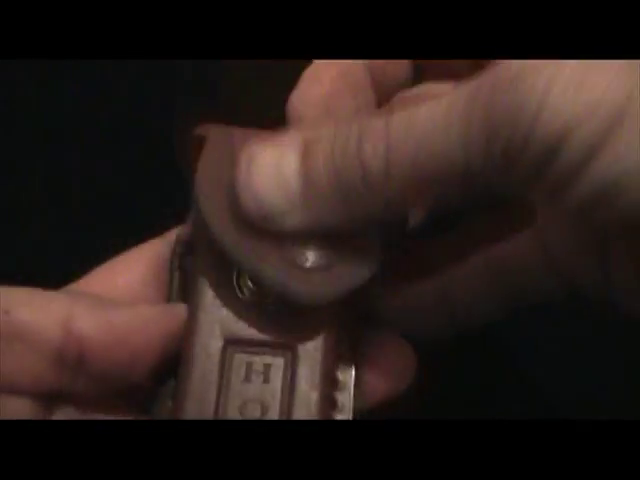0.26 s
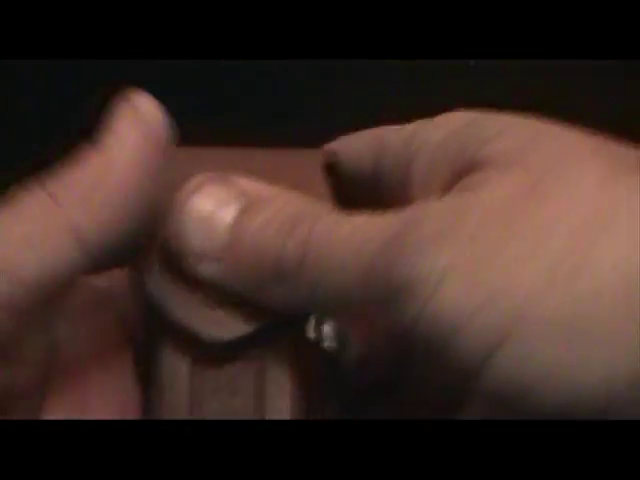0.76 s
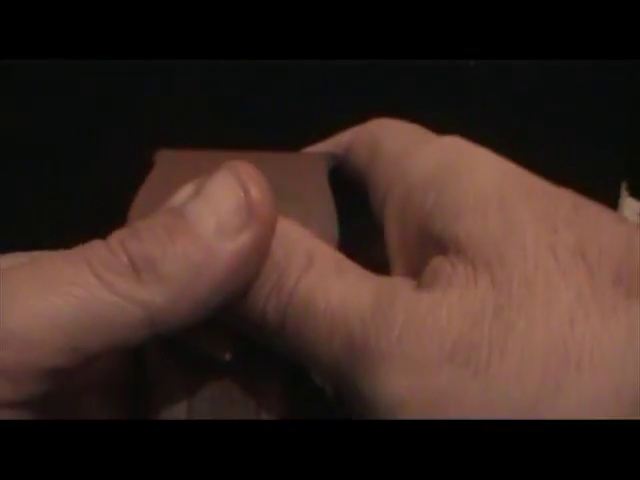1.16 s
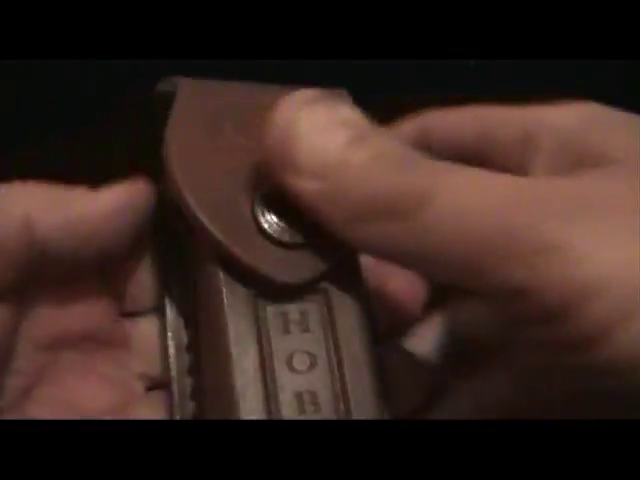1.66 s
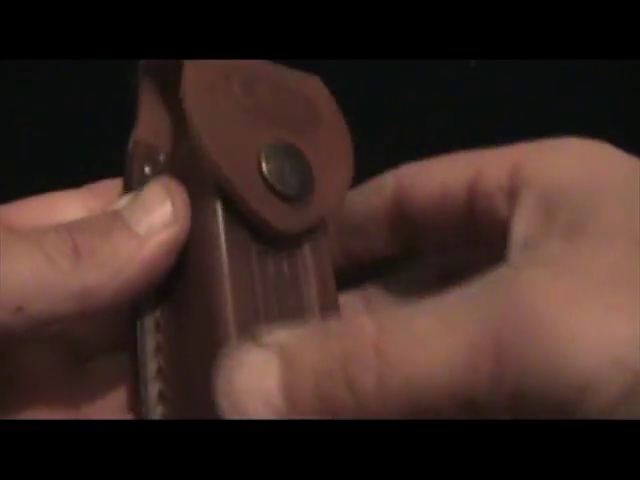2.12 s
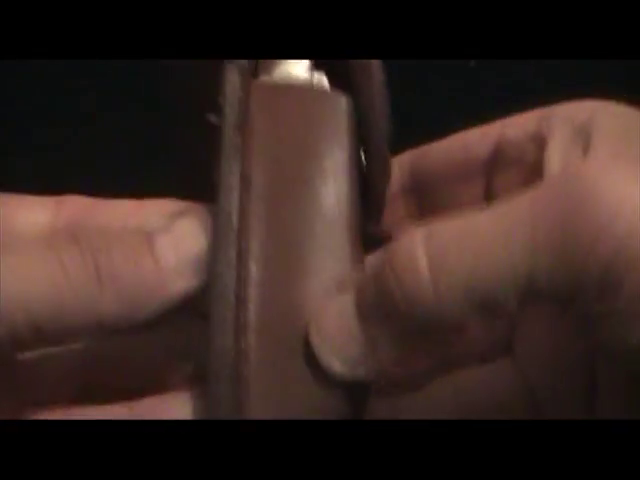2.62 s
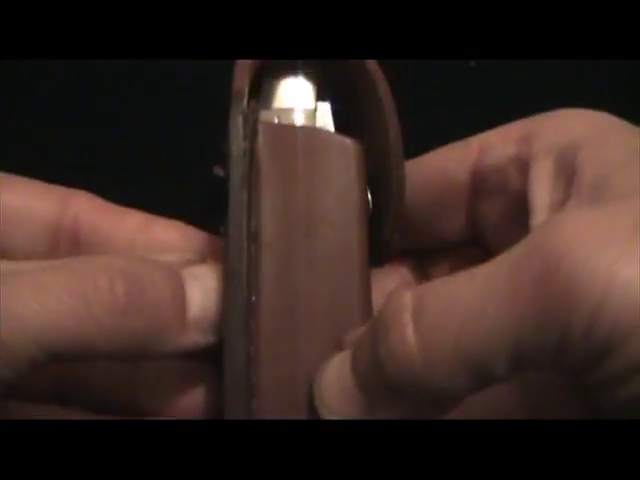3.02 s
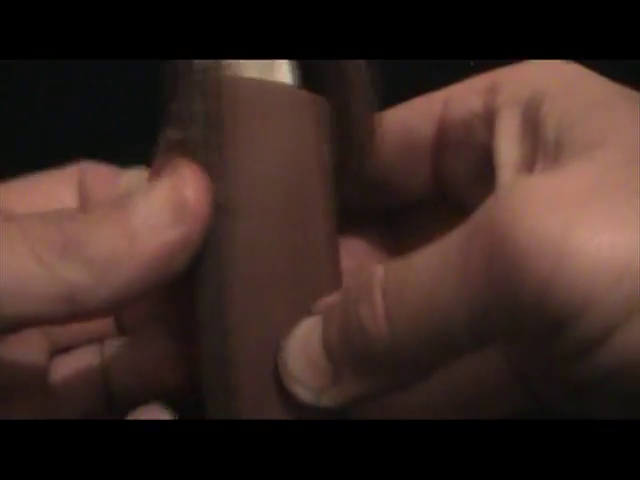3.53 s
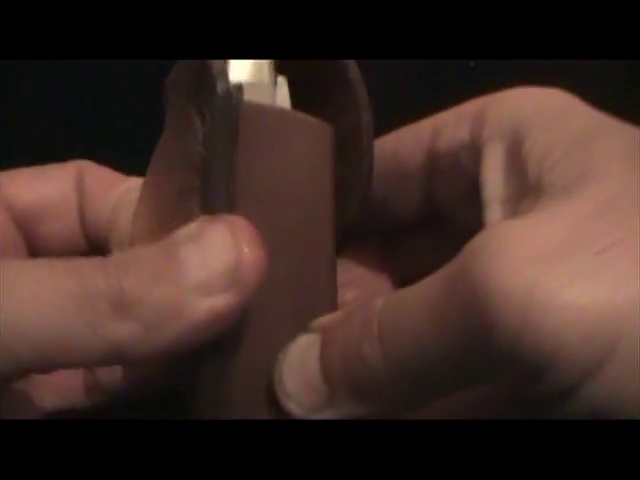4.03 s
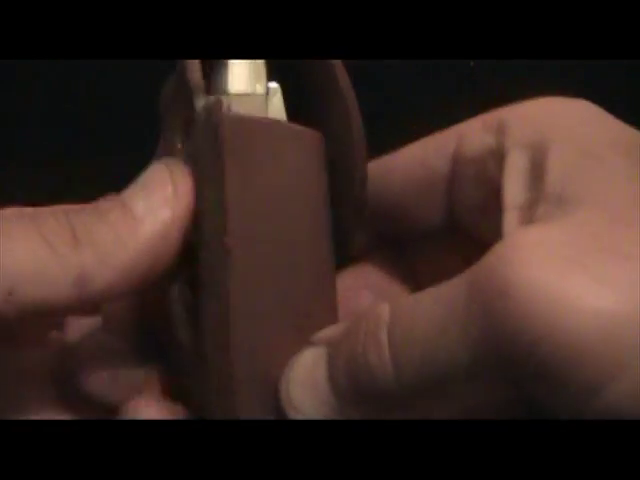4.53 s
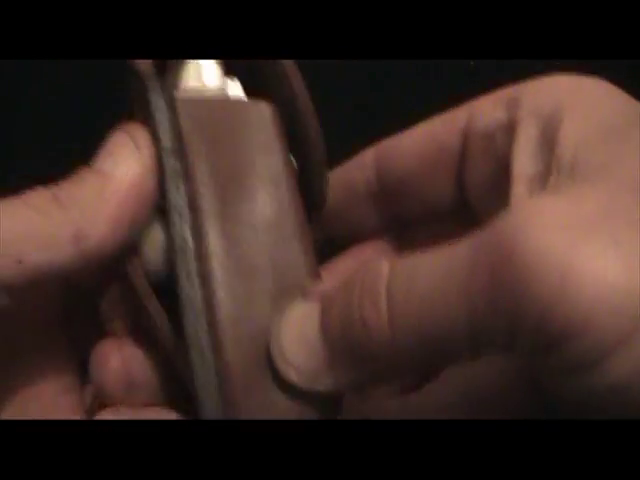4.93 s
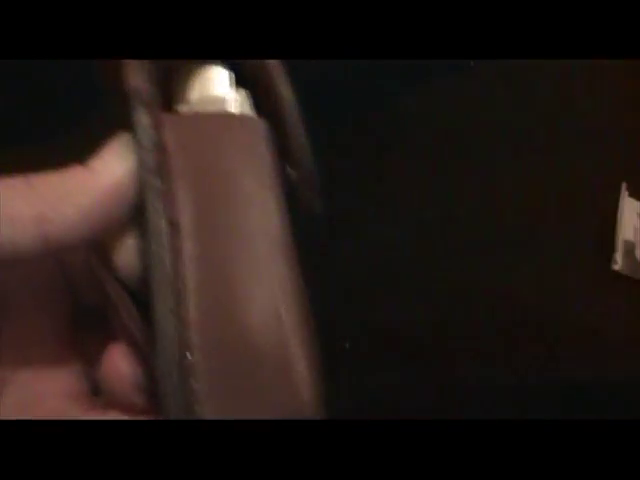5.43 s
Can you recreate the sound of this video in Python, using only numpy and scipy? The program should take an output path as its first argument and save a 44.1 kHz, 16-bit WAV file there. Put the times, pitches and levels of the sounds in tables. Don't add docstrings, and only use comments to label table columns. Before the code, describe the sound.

Near, dry leather sounds over low microphone hiss: fingers stroke and squeeze a flap, a metal stud bangs shut with a bright crack and faint room tail, the hollow sheath is turned and tapped, and its belt loop is pried with dense creaking and woody pops. The last second is nearly still, with light rubbing.

```python
import sys
import numpy as np
from scipy import signal
from scipy.fft import rfft, irfft
from scipy.io import wavfile
from scipy.ndimage import uniform_filter1d

SR = 44100
rng = np.random.default_rng(int(sys.argv[2]) if len(sys.argv) > 2 else 0)


def boost(x):
    u = np.asarray(x, float) / 20
    return 10 ** u


def dump_mix(stems):
    frames = np.atleast_2d(stems).T
    limited = np.clip(frames, -1, 1)
    pcm = np.round(limited * 32767).astype(np.int16)
    wavfile.write(sys.argv[1], SR, pcm)


N = 249951
TIME = np.arange(N) / SR
SNAP_S = 1.226
STROKE_FADE_DB, STROKE_ROUNDNESS = 17, 1.8


def unit(x):
    return x / np.sqrt(np.mean(x ** 2))


def colour(x, points):
    hz, db = np.transpose(points)
    bins = np.maximum(np.fft.rfftfreq(x.shape[-1], 1 / SR), 1)
    gain = boost(np.interp(np.log(bins), np.log(hz), db))
    return irfft(rfft(x) * gain, x.shape[-1])


def band(x, hz, width):
    return signal.lfilter(*signal.iirpeak(hz, hz / width, fs=SR), x)


def resonate(x, peaks):
    return unit(sum(boost(db) * band(band(x, hz, width), hz, width) for hz, width, db in peaks))


def butter(x, order, hz, kind="lowpass"):
    return signal.sosfilt(signal.butter(order, hz, kind, fs=SR, output="sos"), x)


def ring(hz, t60, size):
    t = TIME[:size]
    return np.sin(2 * np.pi * hz * t) * np.exp(-np.log(1000) * t / t60)


def add(out, s, sound):
    i = int(s * SR)
    out[i:i + len(sound)] += sound[:N - i]


def walk(rate):
    k = int(SR / rate)
    return uniform_filter1d(np.repeat(rng.standard_normal(N // k + 1), k), k)[:N]


def hush():
    # (frequency [Hz], level per Hz [dB])
    hush_colour = [(15, -65), (25, -21), (130, -6.5), (330, -10), (1250, -16), (4400, -26.5), (7650, -34.5),
                   (14500, -38)]
    # (frequency [Hz], side minus mid [dB])
    hush_side = [(60, 6), (150, -2.5), (400, 3), (15000, 4.5)]
    # (frequency [Hz], level [dB], phase [rad])
    whine_ports = [(15735, -65, 0), (15735, -67.5, -2.2)]
    # (frequency [Hz], width [Hz], level [dB])
    hum_bands = [(219, 45, -62.5), (513, 40, -76.5)]
    mid, side = colour(rng.standard_normal((2, N)), hush_colour)
    mid, side = butter([mid, colour(side, hush_side)], 8, 14300.)
    gain = boost(-59.5 + 0.56 * walk(2.7)) / np.std(mid)
    whine = []
    for hz, db, lag in whine_ports:
        strength = np.sqrt(2) * boost(db + 2.2 * walk(14.))
        whine.append(strength * np.sin(2 * np.pi * hz * TIME + lag + .2 * walk(8.)))
    hum = 0
    for hz, width, db in hum_bands:
        drone = band(band(rng.standard_normal((2, N)), hz, width), hz, width)
        hum = hum + boost(db) * unit(drone)
    return gain * np.array([mid + side, mid - side]) + whine + hum


def slips(per_s, spread_db):
    when = rng.random(N) < per_s / SR
    size = np.minimum(rng.exponential(size=N), 3)
    return when * boost(spread_db * size) * np.sign(rng.standard_normal(N))


def strokes():
    # (loudest at [s],
    # reach [s], body [dB], rasp re body [dB], dry hiss re body [dB])
    skin_strokes = [(.03, 0.29, -60, -2, -5.5), (0.217, 0.052, -51, -8, -16), (0.316, 0.036, -47.5, -3, -6),
                    (.375, 0.054, -49, -12, -14), (0.4125, 0.0032, -49.5, -1, 9.5),
                    (.53, 0.16, -55.5, -7.5, -11), (.63, 0.1, -58, -1.5, -0.5),
                    (.688, 0.06, -45.5, -14, -18.5), (0.789, 0.025, -48.5, -26, -13),
                    (.905, 0.057, -53, -11, -12.5), (1.0, 0.125, -59, -10.5, -14),
                    (1.15, 0.16, -55, -14.5, -16), (1.265, 0.063, -38, -10.5, -23),
                    (1.33, 0.053, -50, -15, -15.5), (1.47, 0.02, -52, -5.5, -15),
                    (1.495, 0.0296, -51, -5, 3.5), (1.575, 0.061, -53, -2, -6),
                    (1.722, 0.049, -49.5, -10, -5), (1.906, 0.058, -47, -7.5, -4),
                    (2.04, 0.054, -48.5, -6, -11.5), (2.14, 0.066, -52, -8, -10.5),
                    (2.22, 0.11, -61.5, -3, -8), (2.391, 0.043, -56, -3, -2),
                    (2.449, 0.034, -45.5, -10.5, -8.5), (2.56, 0.099, -48.5, -4.5, -15),
                    (2.66, 0.052, -54.5, -6, -11), (2.83, 0.044, -59.5, 3, -13),
                    (2.918, 0.019, -47.5, -5, -12), (3.023, 0.005, -53, 8, 1),
                    (3.045, 0.00925, -54, -4.5, -15.5), (3.08, .15, -71.5, -5, -19),
                    (3.2, 0.069, -57, -16, -28.5),
                    (3.291, 0.091, -51, -2, -10.5), (3.38, 0.1, -56.5, -15.5, -36.5),
                    (3.47, 0.068, -57.5, -6.5, -23.5), (3.522, 0.02, -44.5, 0, -4.5),
                    (3.552, 0.027, -38.5, 0.5, -6.5), (3.666, 0.05, -51, -3, -8),
                    (3.72, 0.033, -52.5, -1.5, -15.5), (3.775, 0.03, -50.5, -1, -5),
                    (3.9, 0.067, -53.5, -7, -17), (3.98, 0.12, -56, -7, -20),
                    (4.093, 0.044, -47.5, -3, -12), (4.263, 0.0334, -46.5, -6.5, -9),
                    (4.428, 0.0343, -38, -11, -11.5), (4.472, 0.017, -39, -7.5, -3),
                    (4.351, 0.054, -51.5, -6, -8), (4.572, 0.074, -52.5, -1.5, -8.5),
                    (4.68, 0.068, -54.5, -16, -15), (4.76, 0.094, -57, -7, -16),
                    (4.856, 0.037, -50, -8.5, -21), (4.885, 0.0099, -32, -5, -7.5),
                    (4.96, 0.053, -65, -17, -19.5), (5.07, 0.22, -62, -7, -11),
                    (5.212, 0.0278, -50.5, -1, -9.5), (5.66, 0.099, -59.5, 2, -5.5)]
    hold_db = -70.5 + np.array([[0], [-6.5], [-5]])
    power = boost(hold_db) ** 2 * np.ones(N)
    for s, reach, db, rasp_db, hiss_db in skin_strokes:
        near = slice(max(int((s - 3 * reach) * SR), 0), int((s + 3 * reach) * SR))
        swell_db = db - STROKE_FADE_DB * np.abs((TIME[near] - s) / reach) ** STROKE_ROUNDNESS
        power[:, near] += boost(swell_db + np.array([[0], [rasp_db], [hiss_db]])) ** 2
    return np.sqrt(power)


def rub():
    # (frequency [Hz], width [Hz], level [dB])
    hollow = [(814.3, 700, 2.5), (1250, 930, 9), (1860, 1200, 6), (2293, 1300, -8.5)]
    # (frequency [Hz], width [Hz], level [dB])
    loop_ring = [(1370, 1136, 0)]
    # (frequency [Hz], width [Hz], level [dB])
    grain = [(3140, 1600, 17), (4145, 2300, 9)]
    # (frequency [Hz], width [Hz], level [dB])
    dry_skin = [(7670, 4200, 0), (12800, 18000, -6.5)]
    turned_s, turned_share = 1.62, .35
    pried_s, pried_share = 3.25, 0.6
    body_gain, rasp_gain, hiss_gain = strokes()
    coarse, fine = unit(slips(3000., 3.)), unit(slips(12000., 0.83))
    flutter = boost(1.8 * walk(90.))
    body = resonate(coarse + 0.32 * fine, hollow) * body_gain * boost(1.5 * walk(140.))
    loop = resonate(coarse, loop_ring) * body_gain
    pried = np.where(TIME > pried_s, pried_share, turned_share * (TIME > turned_s))
    body = np.sqrt(1 - pried) * body + np.sqrt(pried) * loop
    rasp = resonate(1.6 * coarse + fine, grain) * rasp_gain * boost(1.1 * walk(30.))
    hiss = resonate(0.047 * coarse + fine, dry_skin) * hiss_gain * boost(2.4 * walk(30.))
    return boost(-2.0) * flutter * (body + rasp + hiss)


def releases():
    # (time [s], peak [dB])
    nail_ticks = [(.0715, -59), (.3155, -36), (.4038, -44), (.6613, -43.5), (1.69, -50.5), (1.884, -46),
                  (2.6694, -49), (2.6898, -46.5), (3.2561, -52), (3.449, -38), (3.4695, -51.5),
                  (3.9146, -47.5), (4.6497, -45), (2.699, -55), (4.5688, -46)]
    # (time [s], peak [dB], ring [Hz])
    crisp_creaks = [(.3831, -42, 860), (.413, -40, 1600), (2.896, -48, 1682), (2.899, -51, 1600),
                    (4.4175, -35, 1730), (4.4645, -35, 1554), (.9478, -37.5, 1210), (1.8432, -45.5, 2455),
                    (2.405, -42, 1627), (2.4608, -32, 1860), (2.6508, -45, 1208), (3.2846, -46, 1274),
                    (3.3185, -44, 2370), (3.3714, -34, 1250), (3.3798, -34, 1210), (3.5123, -34, 1090),
                    (3.7012, -36, 1560), (3.9197, -40.5, 1117), (3.946, -34, 1250), (3.9651, -34.5, 1250),
                    (4.1557, -45.5, 1020), (4.248, -31.5, 1220), (4.274, -25.5, 1350), (4.3937, -35, 1300),
                    (4.4065, -39, 1346), (4.4851, -28, 1290), (4.5159, -33.5, 1430), (4.55, -35, 1410),
                    (4.698, -34, 1250), (4.8783, -40.5, 1156)]
    # (time [s], peak [dB], ring [Hz], crack re peak [dB], thump re peak [dB])
    pops = [(.4195, -27, 1260, -15, -20.5), (2.9052, -28, 1340, -23.5, -8.5),
            (2.9083, -33, 1150, -5, -13.5), (3.5529, -31.5, 1600, 3.5, -10), (4.3603, -15, 1370, -14, -35),
            (4.4375, -28, 1410, -11, -31.5), (4.4401, -24, 1250, -11, -28),
            (4.4423, -13.5, 1064, -13.5, -6.5), (4.4715, -24.5, 1350, -21.5, -34.5),
            (4.474, -32.5, 1100, -16, -34), (4.8838, -26, 1650, -4.5, -11.5), (4.8872, -21, 1374, -5.5, -5),
            (4.8903, -29, 1377, -20, -15), (.4222, -33.5, 1200, -31, -20.5)]
    # (time [s], peak [dB], ring [Hz])
    dull_creaks = [(.462, -41, 1180), (.6859, -38.5, 1240), (.8, -40, 2370), (.8308, -35.5, 2284),
                   (2.142, -44.5, 2360), (2.4478, -36, 1194), (2.4537, -35, 1045), (3.1549, -40, 2370),
                   (3.334, -32.5, 1450), (3.3428, -41.5, 1155), (3.495, -44, 1750), (3.6135, -43, 1490),
                   (3.624, -28.5, 1348), (4.4545, -32, 903), (4.4785, -35, 1300), (3.786, -41.5, 1415),
                   (3.8683, -44.5, 1105), (4.0, -41, 1033), (4.0887, -42, 1002), (4.5647, -29, 1548),
                   (4.6027, -31, 1530), (4.6107, -44, 1220), (4.6223, -31.5, 1330), (4.656, -31, 1470),
                   (4.7545, -45.5, 1300), (4.9178, -40, 1340), (4.8985, -38, 1390), (4.671, -38, 1280),
                   (4.6755, -46.5, 1405), (4.6805, -45.5, 1250), (4.7165, -38, 1350), (4.725, -46, 1413),
                   (4.7455, -43.5, 1500), (4.789, -48, 1300), (4.595, -38, 1307), (5.2206, -51.5, 1308),
                   (5.4258, -44.5, 1977)]
    # (time [s], peak [dB], ring [Hz], crack re peak [dB])
    taps = [(.7868, -45.5, 1263, -19.5), (1.4704, -39, 1093, -2.5), (2.25, -46, 1520, -21),
            (2.9473, -40, 1790, -1), (2.9715, -46.5, 1900, -0.5), (2.9965, -43, 1637, 3),
            (3.0055, -50, 1200, -11), (3.028, -44, 745, 1), (3.0806, -39.5, 881.7, 0.5),
            (3.1094, -38, 944, -2.5), (3.1269, -40, 1250, 2), (3.1472, -32.5, 1610, 0.5),
            (4.063, -37.5, 1067, -22), (4.2812, -39, 1440, -21), (4.3272, -42, 1480, -12.5),
            (4.3495, -46, 1370, -17), (4.4141, -36, 2140, -9)]
    # (time [s], peak [dB], ring [Hz])
    fibres = [(.8947, -41, 2304), (1.1215, -55, 2300), (1.1348, -44, 1908), (3.3305, -39, 1497),
              (3.3375, -34, 1350), (3.3575, -45, 1300), (3.3845, -42, 1250), (3.9262, -47, 2300),
              (4.055, -47, 1900), (4.0835, -43, 1300), (4.2515, -38, 2200), (4.2695, -39, 2000),
              (4.7375, -46, 1600), (5.0655, -45, 1400), (5.0745, -45, 1500)]
    # (time [s], peak [dB], ring [Hz])
    squeeze = [
        (1.0945, -35, 1840),
        (1.1015, -35, 1100),
        (1.1048, -28.5, 1535),
        (1.1163, -32.5, 1900),
        (1.1303, -33, 2379),
        (1.1455, -32.5, 1340),
        (1.168, -30, 1700),
        (1.1829, -29.5, 2230),
        (1.195, -31, 1004),
        (1.2092, -34.5, 980),
    ]
    # (time [s], peak [dB], ring [Hz])
    settling = [(1.2385, -34.5, 952), (1.2475, -30, 1250), (1.258, -34, 993), (1.2622, -32.5, 1300),
                (1.2665, -30, 1150), (1.2757, -29, 1250), (1.2865, -32, 1050), (1.2965, -33, 1011),
                (1.3035, -34.5, 1100), (1.311, -34.5, 1052), (1.318, -31, 1050), (1.3252, -30.5, 1156),
                (1.3332, -31, 1064), (1.344, -31, 1046)]
    # (time [s], peak [dB])
    creep = [(4.9262, -40.5), (4.9518, -35), (4.9775, -36.5), (4.9903, -38), (5.0037, -37.5), (5.0569, -44),
             (5.0781, -38.5), (5.0869, -33.5), (5.117, -43.5), (5.1455, -45), (5.212, -41.5)]
    # (ring [Hz] if common, crack re peak [dB], thump re peak [dB])
    kinds = [(nail_ticks, (1600., 5.5, -45)), (crisp_creaks, (-4.5, -21)), (pops, ()),
             (dull_creaks, (-19.5, -23.5)), (taps, (-0.5,)), (fibres, (-7, -29)),
             (squeeze, (-16.5, -29.5)), (settling, (-6.5, -34.5)), (creep, (1350., -8.5, -26))]
    return [(*row, *shared) for rows, shared in kinds for row in rows]


def creaks():
    # (frequency [Hz], level [dB], t60 [s])
    edge_modes = [(3300, 0, .006), (5100, -3, .005), (7500, -11, .003)]
    rows = releases()
    size = 1200
    out, grit, t = np.zeros(N), rng.standard_normal((len(rows), size)), TIME[:size]
    for (s, db, hz, crack_db, thump_db), noise in zip(rows, grit):
        spread = 1 + .05 * noise[:4]
        big = db > -24.5
        loop = s > 4.5
        tap = 2.94 < s < 3.15
        squeezed = .75 < s < 1.22
        settles = SNAP_S < s < 1.35

        swell_s = .0008 if big else .0011 if loop else .0005
        grip_s = 0.00361 if big else .0014 if settles else 0.0023
        onset = 1 - np.exp(-t / swell_s)
        grip = np.exp(-(t / grip_s) ** 2)
        wall_modes = zip((850., 1700., 2350.), (.45, .5, .5), spread)
        walls = sum(g * ring(f * k, 0.055, size) for f, g, k in wall_modes)
        if squeezed:
            body = ring(hz * spread[3], 0.024, size) + 1.3 * walls + 1.2 * band(noise, 1600., 1700.0)
        else:
            wall_share = .12 if big else 0.45 if settles else 0.34
            body = ring(hz * spread[3] ** 1.2, 0.015, size) + wall_share * walls
        body = onset * grip * body

        top_hz = 6800. * 2 ** (crack_db / 18.) * (3 if loop else 1)
        top_hz = 7000. if tap else np.clip(top_hz, 3500, 14000)
        edge = sum(boost(g) * ring(f * k, t60, size) for (f, g, t60), k in zip(edge_modes, spread[1:]))
        tearing = band(band(band(noise, 2900.0, 5500.), 3200.0, 7000.), 4200., 8000.)
        tearing_gain = 0.88 if tap else 2.8
        crack = butter(edge + tearing_gain * tearing * np.exp(-t / 0.0012), 3, top_hz)

        thump = band(ring(540.0 * spread[2], 0.0087, size), 350.0, 600.) + 0.1 * ring(330.0, 0.0073, size)
        boom = .8 if tap else 0.47 * big
        thump = thump + boom * np.abs(thump).max() * ring(340.0, 0.018, size)

        body, crack, thump = (v / np.abs(v).max() for v in (body, crack, thump))
        release = 1.135 * body + boost(crack_db + 3.5) * crack + boost(thump_db + 0.86) * thump
        add(out, s - .0003, -boost(db) * release)
    return butter(out, 2, 110., "highpass")


def room(x):
    # (frequency [Hz], t60 [s], level [dB])
    room_octaves = [(595.6, 0.36, -43), (1200, 0.7, -36.5), (2470, 0.32, -35.5), (4852, .3, -31),
                    (8000, .21, -30.5), (11140, 0.11, -35.5), (14500, .055, -45.5)]
    gap_s = 0.0081
    t = TIME[:22050]
    start = np.clip((t - gap_s) / .008, .22, 1)
    noise = rng.standard_normal((2, len(t)))
    tail = 0
    for hz, t60, db in room_octaves:
        octave = butter(noise, 3, [hz / 1.45, min(hz * 1.3, 17000)], "bandpass")
        tail = tail + boost(db - 13.0) * octave * np.exp(-np.log(1000) * t / t60)
    return signal.fftconvolve(x[None], start * tail, axes=1)[:, :N]


def motor():
    out = np.zeros(N)
    field_s = 1 / 59.94
    cycles = np.arange(.1218, N / SR, 9 * field_s)
    steps = (cycles[:, None] + np.array((0, 2, 4, 6)) * field_s).ravel()
    for s, chance in zip(steps[steps < N / SR], rng.standard_normal(len(steps))):
        add(out, s - .002, boost(-56 + 1.5 * chance) * ring(3950., .012, size=900))
    return out


def whistles():
    # (loudest at [s], reach [s], frequency [Hz], level [dB])
    ridge_drags = [(.218, 0.034, 4500, -51), (.222, .04, 8800, -69), (0.296, 0.019, 4600, -56.5),
                   (.35, .06, 8000, -66), (.89, .025, 8500, -63), (.92, .03, 13500, -62.5),
                   (1.265, 0.042, 3700, -46), (1.27, .04, 2400, -44), (2.92, 0.018, 3500, -55),
                   (4.468, 0.011, 3300, -50), (1.27, .06, 5800, -50), (1.28, .06, 8200, -56),
                   (.305, 0.017, 8500, -55.5), (2.38, .03, 3290, -64), (2.56, .09, 6000, -66.5),
                   (2.63, .05, 3180, -64), (3.29, 0.053, 5300, -62), (3.54, 0.05, 3150, -51.5),
                   (4.272, .009, 3970, -46), (4.782, .014, 3600, -61), (5.213, 0.021, 4600, -60)]
    out = np.zeros(N)
    t = TIME[:13000] - TIME[6500]
    for (s, reach, hz, db), noise in zip(ridge_drags, rng.standard_normal((len(ridge_drags), 13000))):
        width = hz / 3.5
        tuned = unit(band(band(noise, hz, width), hz, width))
        swell_db = db - STROKE_FADE_DB * np.abs(t / reach) ** STROKE_ROUNDNESS
        add(out, s - TIME[6500], tuned * boost(swell_db))
    return out


def stud():
    # (time [s], level [dB], push [ms])
    cap_taps = [
        (.402, -33, .03),
        (.4158, -34, .03),
        (.4195, -29, .05),
    ]
    # (time [s], level [dB], push [ms])
    snap_blows = [
        (1.2213, -7.5, 0.074),
        (1.2221, -11.5, 0.24),
        (1.224, -9.5, 0.26),
        (1.2257, -0.5, .03),
        (1.22604, -0.5, 0.046),
        (1.22638, 3, 0.093),
        (1.22683, 3, .14),
        (1.2273, 4, .18),
        (1.2279, 2.5, 0.17),
        (1.2287, -3.5, .2),
    ]
    # (frequency [Hz], level [dB], t60 [s])
    stud_modes = [(616.7, -30.5, 0.005), (1100, -11.5, 0.019), (1350, -8.5, 0.0081), (1700, -7.5, 0.009),
                  (2400, 1, 0.0074), (3600, 2, 0.0026), (4400, 3.5, 0.0033), (5605, -3, 0.004),
                  (6600, 1.5, .003), (8030, 10.5, 0.003), (8940, 8, 0.0024), (10900, 5.5, .0025),
                  (12787, 1, 0.0018)]
    # (time [s], frequency [Hz], level [dB], t60 [s])
    metal_rings = [(.4022, 9000, -33, .006), (.4158, 5700, -33, .008), (.6608, 6000, -38, .012),
                   (.6608, 9000, -43, .008), (1.228, 2140, -50, .8), (1.238, 5550, -29, .018),
                   (1.239, 3650, -28, .02), (2.905, 3500, -40, .03), (3.0806, 5200, -46, .012),
                   (3.1472, 5100, -39, .012), (3.9651, 5000, -41, .012), (4.8835, 4550, -32, .03),
                   (5.29, 7880, -73, 1.2)]
    out = np.zeros(N)
    thumb = np.exp(-(TIME[:900] / 0.0037) ** 2)
    for s, db, push_ms in cap_taps + snap_blows:
        blow = 0
        for hz, mode_db, t60 in stud_modes:
            softness = 1 / (1 + (hz * push_ms / 500) ** 2)
            blow = blow + boost(mode_db) * softness * ring(hz, t60, size=900)
        add(out, s, -boost(db - 1.0) * thumb * blow)
    metal_onset = np.minimum(TIME[:13000] / 0.0011, 1)
    for s, hz, db, t60 in metal_rings:
        add(out, s, boost(db) * ring(hz, t60, size=13000) * metal_onset)
    out = butter(out, 2, 13000.)
    return butter(out, 4, 550., "highpass")


def jolts():
    # (time [s], level [dB])
    shakes = [
        (1.225, -19),
        (1.47, -41),
        (2.929, -41),
        (3.553, -35),
        (3.885, -46),
        (4.272, -47),
        (4.48, -28),
        (4.64, -50.5),
        (4.887, -36),
    ]
    out = np.zeros(N)
    for s, db in shakes:
        add(out, s, boost(db) * ring(48.29, 0.013, size=6000))
    pan_db = 12
    return out * boost(np.array([[pan_db], [-pan_db]]) / 2)


def scene():
    # (frequency [Hz], side minus mid [dB])
    side_colour = [(60, -6.5), (250, -12.5), (700, -19), (2500, -14.5), (5000, -12), (12000, -9)]
    leather = butter(rub() + creaks(), 8, 14600.)
    near = leather + stud()
    side = signal.hilbert(colour(near, side_colour)).imag
    side -= 0.36 * band(near, 330., 250.)
    to_walls = leather.copy()
    add(to_walls, SNAP_S, np.array([boost(19.)]))
    direct = np.array([near + side, near - side])
    return direct + room(to_walls) + motor() + jolts() + hush() + whistles()


def roll_off(x):
    return signal.sosfilt(signal.butter(12, 16300, fs=SR, output="sos"), x)


def record(dry):
    clipped = np.clip(dry, -.9, .9)
    bass = signal.butter(2, 600., fs=SR, output="sos")
    clipped = clipped + .85 * signal.sosfiltfilt(bass, dry - clipped)
    narrow = signal.sosfilt(signal.ellip(6, .3, 50, 15900., fs=SR, output="sos"), clipped)
    mix = np.clip(narrow, -.99, .99)
    return roll_off(mix)


dry = scene()
out = record(dry)
dump_mix(out)
```